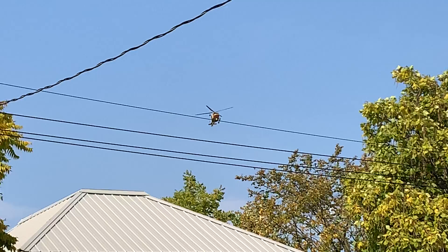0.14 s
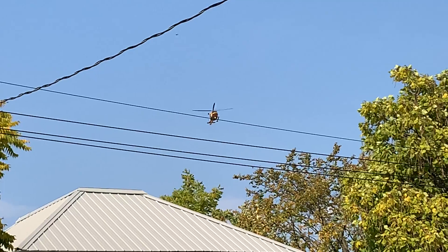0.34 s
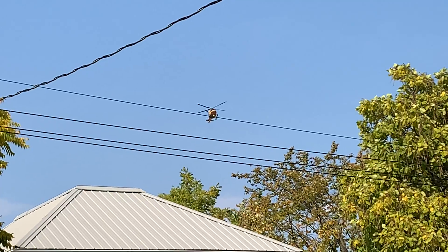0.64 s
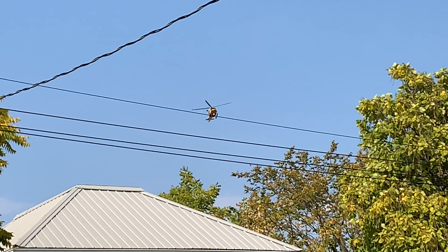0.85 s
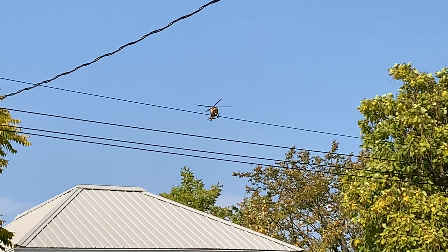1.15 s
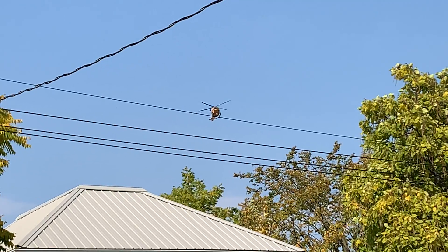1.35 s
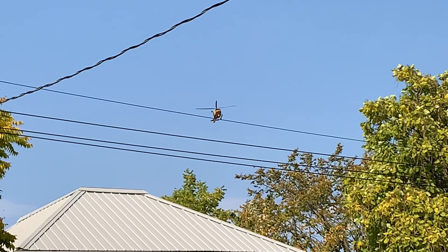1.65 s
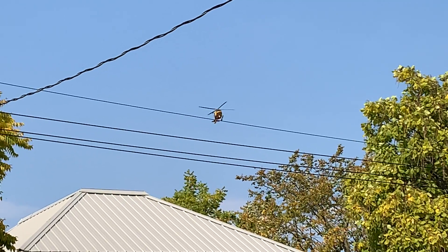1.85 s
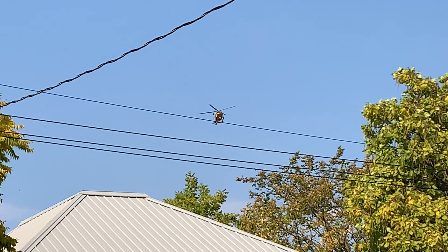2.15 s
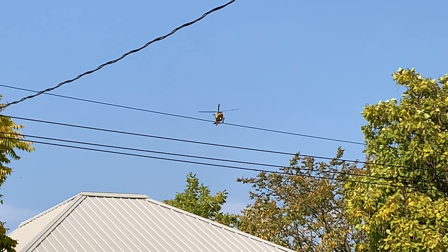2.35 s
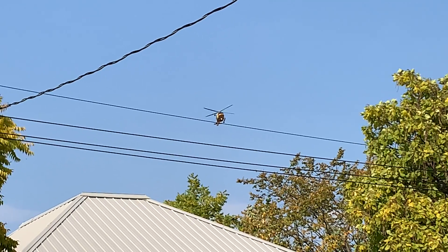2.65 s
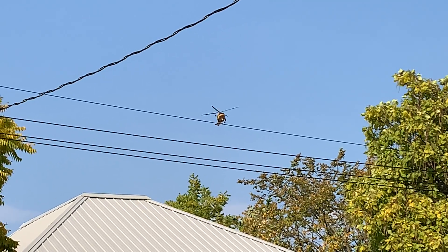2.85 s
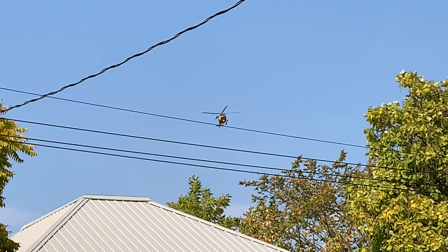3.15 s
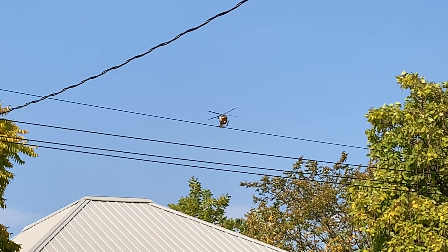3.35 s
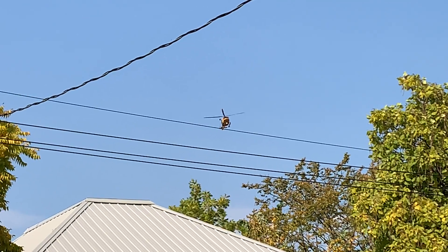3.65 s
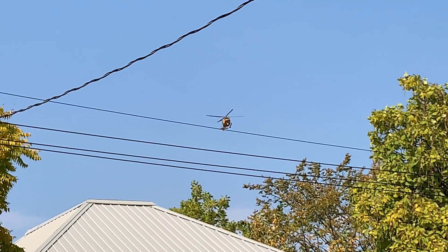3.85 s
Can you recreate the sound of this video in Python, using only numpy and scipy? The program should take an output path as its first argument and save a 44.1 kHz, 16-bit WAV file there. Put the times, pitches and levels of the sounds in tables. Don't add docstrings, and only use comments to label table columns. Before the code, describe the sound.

Distant helicopter hovering, rapid chopping blade slaps over a steady low drone and roar

```python
import sys
import numpy as np
from scipy import signal
from scipy.fft import rfft, irfft
from scipy.io import wavfile
from scipy.ndimage import uniform_filter1d

SR = 44100
rng = np.random.default_rng(int(sys.argv[2]) if len(sys.argv) > 2 else 0)


def invert_db(level):
    return 10 ** (np.asarray(level, dtype=float) / 20)


def wav_record(signal):
    frames = np.transpose(np.atleast_2d(signal))
    bounded = np.clip(frames, -1, 1)
    quanta = np.round(bounded * 32767).astype(np.int16)
    wavfile.write(sys.argv[1], SR, quanta)


N = 176400
TIME = np.arange(N) / SR
FREQ = np.arange(N // 2 + 1) * SR / N
BLADE_HZ = 21.505
TAIL_HZ = 55.16


def level(x, db):
    return x * invert_db(db) / np.sqrt(np.mean(x ** 2))


def colour(points, hz):
    table_hz, db = np.array(points, float).T
    return invert_db(np.interp(np.log(hz + 1), np.log(table_hz), db, left=-90, right=-90))


def walk(rate):
    hold = int(SR / rate)
    held = np.repeat(rng.standard_normal(N // hold + 1), hold)
    return 1.34 * uniform_filter1d(uniform_filter1d(held, hold), hold)[:N]


def bands(points, per_octave):
    spectrum = rfft(rng.standard_normal((2, N))) * colour(points, FREQ)
    place = np.log2(FREQ + 1) * per_octave
    first = int(np.log2(points[0][0]) * per_octave)
    last = int(np.log2(points[-1][0]) * per_octave) + 1
    for k in range(first, last + 1):
        triangle = np.clip(1 - abs(place - k), 0, 1)
        yield 2 ** (k / per_octave), irfft(spectrum * triangle, N)


# multiple of the rotor tone, level in dB.
TAIL_HARMONICS = [(1, -41), (2, -25), (3, -35), (4, -32), (5, -39.5), (6, -34), (7, -84), (8, -65)]
# multiple of the blade rate, level in dB.
BLADE_HARMONICS = [(2, -44), (3, -42), (4, -41), (5, -43)]


def rotor_tones(harmonics, hz):
    out = 0
    for multiple, db in harmonics:
        wander = 0.35 * np.sqrt(multiple) * walk(3.016)
        phase = 2 * np.pi * (multiple * hz * TIME + rng.random()) + wander
        flutter_db = 1.8 * walk(14)
        out = out + np.sqrt(2) * invert_db(db + flutter_db) * np.sin(phase)
    return np.array([out, 0 * out])


# time in seconds, level in dB, extra treble in dB, extra body in dB.
SLAP_COURSE = [(0, -36.5, 1.5, 2), (.09, -30.5, 4, 3), (.2, -39.5, 3.5, 14.5), (.55, -37, 11, 4),
               (.7, -31, 2, -1), (1.1, -30, 1, -6), (1.4, -31.5, 1, -4.5), (1.75, -38.5, 10.5, 4),
               (1.97, -33.5, -3.5, -23.5), (2.2, -37, 10.5, 8), (2.7, -34.5, 3, 3), (2.95, -29.5, 0.5, 4.5),
               (3.15, -31, 5, 7.5), (3.28, -25, 1, -4), (3.45, -22.5, -6.5, -1), (3.55, -26, 3.5, -2),
               (3.8, -23, -0.5, -5), (4, -27.5, -0.5, 1)]


def slap_course(column):
    course = np.array(SLAP_COURSE)
    return np.interp(TIME, course[:, 0], course[:, column])


BLADE_LEVELS = [-.5, -.8, 1.2, 0]
# frequency in Hz, density in dB per Hz.
SLAP_SPECTRUM = [(150, -10), (500, 1.5), (900, 2.5), (1600, -2), (2200, -7.5), (4500, -19), (5500, -35),
                 (8500, -41)]


def slaps():
    first_s, rise_s, decay_s, echo_s, echo_db = -0.0015, 0.009, 0.012, 0.03, -7
    turns = (TIME - first_s + rise_s) * BLADE_HZ
    passage, age = turns.astype(int), turns % 1 / BLADE_HZ
    rise = np.sin(np.pi / 2 * np.clip(age / rise_s, 0, 1)) ** 2
    late = np.maximum(age - rise_s, 0)
    envelope = rise * (np.exp(-late / decay_s) + invert_db(echo_db) * np.exp(-late / echo_s))

    count = passage[-1] + 1
    size_db = np.resize(BLADE_LEVELS, count) + 0.6 * rng.standard_normal(count)
    treble, body = invert_db(slap_course(column=2)), invert_db(slap_course(column=3))
    drift_blades = 4
    burst = 0
    for hz, band in bands(SLAP_SPECTRUM, per_octave=4):
        drift = uniform_filter1d(rng.standard_normal(count), drift_blades) * np.sqrt(drift_blades)
        tint_db = 2.2 * rng.standard_normal(count) + 1.5 * drift
        gain = invert_db(size_db + tint_db)[passage]
        if hz > 2300:
            gain = gain * treble
        elif hz < 1000:
            gain = gain * body
        burst = burst + band * gain
    return level(burst * envelope, 0) * invert_db(slap_course(column=1))


# time in seconds, peak level in dB, ring frequency in Hz.
GAP_RINGS = [(0.0933, -14.5, 1340), (0.2738, -20.5, 1203), (0.3687, -23.5, 1265), (0.4602, -21.5, 1260),
             (0.5501, -20, 1213), (0.596, -21.5, 1260), (0.6445, -14, 1405), (0.692, -20, 1370),
             (0.7378, -21.5, 1256), (0.7861, -22, 1460), (0.831, -18, 1530), (0.8834, -26, 1700),
             (0.924, -21, 1330), (0.9769, -17.5, 1760), (1.0181, -24, 1445), (1.064, -22, 1490),
             (1.1104, -44, 1176), (1.1598, -19.5, 1746), (1.2037, -25, 1310), (1.2491, -22, 1437),
             (1.3889, -15, 1353), (1.437, -14, 1445), (1.4797, -30, 1330), (1.5274, -31, 1310),
             (1.575, -20, 1336), (1.619, -21.5, 1366), (1.673, -16.5, 1315), (1.7589, -22.5, 1153),
             (1.945, -21, 1376), (2.0413, -22.5, 1170), (2.1355, -21, 1335), (2.56, -21, 1500),
             (2.8348, -22, 1850), (2.8784, -25, 1025), (2.9234, -18, 1160), (2.969, -20, 1217),
             (3.015, -25, 1044), (3.0634, -21.5, 1910), (3.1148, -19, 1650), (3.1593, -30, 1150),
             (3.2065, -19, 1364), (3.253, -15, 1360), (3.2977, -16, 1792), (3.3423, -37, 1210),
             (3.3882, -16, 1755), (3.438, -20, 1370), (3.484, -17, 1470), (3.531, -27, 1730),
             (3.5793, -15, 1770), (3.6244, -12, 1666), (3.6706, -14, 1680), (3.715, -15, 1190),
             (3.7633, -18, 1354), (3.8122, -16, 1403), (3.8576, -16, 987), (3.903, -12, 980)]
BRIGHT_RINGS = [(0.0892, -25.5, 3320), (0.4616, -28, 2480), (0.5532, -26.5, 3900), (0.599, -32, 3900),
                (0.6439, -29, 3830), (0.6903, -38, 3320), (0.7382, -24, 3620), (0.7811, -29.5, 3180),
                (0.9657, -27, 2960), (1.202, -24, 2980), (1.5738, -31, 3280), (1.761, -33, 3810),
                (2.1327, -33, 3090), (2.2762, -28, 2990), (2.317, -25, 2940), (2.387, -24, 3070),
                (2.6374, -28, 2870), (2.7646, -27, 2740), (2.8756, -25.5, 2960), (3.0648, -21, 2690),
                (3.2515, -24, 2470), (3.3903, -31, 3140), (3.4345, -28, 3090), (3.5758, -26, 3280),
                (3.6234, -21, 2720), (3.6706, -28, 3590), (3.7165, -32, 3600), (3.763, -25, 3000),
                (3.813, -20.5, 2870), (3.904, -21.5, 3040)]
DEEP_RINGS = [(0.505, -20, 502), (0.682, -22, 519), (1.949, -19, 598), (2.176, -22, 610),
              (2.391, -14.5, 806), (2.695, -20.5, 848), (2.767, -19.5, 718), (2.828, -19, 610),
              (3.014, -24, 558), (3.158, -14, 530), (3.212, -19, 536), (3.253, -9, 830),
              (3.296, -14.5, 590), (3.387, -20, 615), (3.439, -16, 877), (3.669, -15, 520),
              (3.713, -13.5, 618), (3.82, -14, 530), (3.861, -12.5, 993)]


def rings():
    attack_s, decay_s, trim_db = 0.005034, 0.015, -4.5
    out, age = np.zeros((2, N + SR)), TIME[:SR // 12]
    swell = age / attack_s * np.exp(1 - age / attack_s)
    decay = (1 - np.exp(-age / attack_s)) * np.exp(-age / decay_s)
    for start, db, hz in GAP_RINGS + BRIGHT_RINGS + DEEP_RINGS:
        width_hz = 92 * hz / 1000
        smooth = signal.butter(2, width_hz, fs=SR, output="sos")
        noise = signal.sosfilt(smooth, rng.standard_normal((2, 2, len(age))))[..., ::-1]
        wobble = (noise[0] + 1j * noise[1]) / noise.std() / 2 + [[1], [0]]
        ring = (wobble * np.exp(2j * np.pi * hz * age)).real
        at = max(int((start - attack_s / 2) * SR), 0)
        out[:, at:at + len(age)] += invert_db(db + trim_db) / 2 * (swell + decay) * ring
    return out[:, :N]


# frequency in Hz, density in dB per Hz.
ROAR_SPECTRUM = [(22, -43.5), (45, 0.5), (90, -0.5), (400, -6), (1500, -19.5), (4000, -32), (8000, -58),
                 (16000, -71.5)]


def roar():
    load = uniform_filter1d(slap_course(column=1), size=SR // 3)
    load_db = 0.35 * (load - load.mean())
    swell_db = 0.5 * walk(3.01)
    out = 0
    for hz, band in bands(ROAR_SPECTRUM, per_octave=1.8):
        follow_db = load_db if hz > 100 else -load_db
        flicker_db = 1.8 * walk(9.7)
        out = out + band * invert_db(swell_db + follow_db + flicker_db)
    return level(out, -25)


# centre in Hz, width in Hz, gain in dB.
REFLECTION_BUMPS = [(420, 70, -5), (540, 60, 3), (630, 40, 3), (740, 60, -2), (850, 60, 4), (1190, 50, 3),
                    (1390, 70, 5), (1470, 40, 3), (1570, 50, -4), (1720, 90, 5), (2050, 120, -3),
                    (2280, 100, 3), (2750, 250, -3), (3600, 400, 3)]


def gardens(x):
    db = sum(gain * np.exp(-((FREQ - hz) / width) ** 2) for hz, width, gain in REFLECTION_BUMPS)
    return irfft(rfft(x) * invert_db(db), N)


# start in seconds, length in seconds, level in dB, low crunch weight in dB.
LEAF_RUSTLES = [(0, 1, -63.5, -6), (0.023, 0.013, -56.5, -19), (0.096, .015, -63, -16),
                (0.332, 0.042, -61, -5), (0.68, 0.018, -56.5, -14), (1, .02, -67, -12),
                (1.545, 0.01, -54, -8), (1.888, 0.0088, -54, -18), (1.935, 0.082, -51.5, -5),
                (2.028, 0.052, -57.5, 2), (2.13, 0.02, -75.5, 20), (2.2, 0.32, -70.5, 19),
                (2.346, 0.027, -45, -1), (2.384, 0.043, -49, 8), (2.444, 0.016, -35, -6),
                (2.486, 0.036, -41.5, 2.5), (2.567, 0.15, -57, 6), (2.634, 0.045, -55.5, -1),
                (2.688, 0.032, -52, 0), (2.764, 0.034, -46.5, 6), (2.823, 0.066, -71, 19),
                (2.94, 0.23, -69, 16), (3.157, 0.0093, -56, -8), (3.384, 0.037, -58.5, 10),
                (3.436, 0.074, -58.5, 14), (3.584, 0.11, -57, -29), (3.718, 0.023, -56, 9.5),
                (4, 0.0088, -52, 7)]
# frequency in Hz, density in dB per Hz.
CRISP_SPECTRUM = [(5000, 2), (8000, 7), (10500, 3.5), (13000, -6.5), (16000, -7.5)]
CRUNCH_SPECTRUM = [(400, 12.5), (800, 9), (1500, 13.5), (3500, 15), (6500, 4.5), (8500, -10.5)]
SCUFF_SPECTRUM = [(250, 13), (450, 27), (850, 20), (1400, -22)]


def leaves():
    attack_s, release, grains_per_s, scuff_smear_s = 0.004, 0.55, 6000, 0.068
    grains = (rng.random((2, N)) < grains_per_s / SR) * rng.standard_normal((2, N))
    spread_db = 2.3 * rng.exponential(size=(2, N))
    spectrum = rfft(grains * invert_db(spread_db) * invert_db(2.2 * walk(45)))
    crisp = irfft(spectrum * colour(CRISP_SPECTRUM, FREQ), N)
    crunch = irfft(spectrum * colour(CRUNCH_SPECTRUM, FREQ), N)
    scuff = irfft(spectrum * colour(SCUFF_SPECTRUM, FREQ), N)

    top, low = np.zeros(N), np.zeros(N)
    for start, length, db, low_db in LEAF_RUSTLES:
        tail = np.exp(-np.maximum(TIME - start - length, 0) / (release * length))
        press = invert_db(db) * np.clip((TIME - start) / attack_s, 0, 1) * tail
        top = top + press
        low = low + invert_db(low_db) * press
    slow = uniform_filter1d(low, int(scuff_smear_s * SR))
    return (crisp * top + crunch * low + scuff * slow) / np.sqrt(np.mean(crisp ** 2))


# start in seconds, length in seconds, pitch in Hz, level in dB.
BIRD_NOTES = [
    (.33, .05, 7700, -63),
    (1.09, .02, 7000, -58),
    (2.2, .05, 8000, -66),
    (2.3, .09, 7640, -47),
    (2.61, .04, 5800, -54),
    (2.65, .07, 8000, -64),
    (2.92, .08, 8000, -62),
    (3.06, .03, 2700, -39),
    (3.31, .06, 8050, -66),
    (3.6, .14, 11400, -60),
]


def bird():
    out = np.zeros(N)
    for start, length, hz, db in BIRD_NOTES:
        envelope = np.sin(np.pi * np.clip((TIME - start) / length, 0, 1)) ** 0.5
        out = out + invert_db(db) * envelope * np.sin(2 * np.pi * hz * TIME + 0.8 * walk(51))
    return np.array([out, 0 * out])


# frequency in Hz, likeness from 0 to 1, phase in radians by which the left leads.
PORTS_BELOW = [(40, .82, 0), (110, .95, -.2), (300, .89, -.3), (950, .66, -.8), (2200, .52, -1.6),
               (3500, .48, -2.2), (4500, .45, -4.7)]
PORTS_ABOVE = [(6400, .7, -6.5), (8750, .99, -3 * np.pi), (11100, .99, -4 * np.pi), (16000, .99, -19)]


def ports(pair):
    hz, like, phase = np.array(PORTS_BELOW + PORTS_ABOVE).T
    like = np.clip(np.interp(np.log(FREQ + 1), np.log(hz), like), 0, 1)
    turn = np.exp(0.5j * np.interp(FREQ, hz, phase))
    mid, side = rfft(pair) * np.sqrt([(1 + like) / 2, (1 - like) / 2])
    bump = invert_db(5 / 2 * np.exp(-((FREQ - 4700) / 1100) ** 2))
    return irfft([(mid + side) * turn / bump, (mid - side) / turn * bump], N)


def scene():
    rotors = rotor_tones(TAIL_HARMONICS, TAIL_HZ) + rotor_tones(BLADE_HARMONICS, BLADE_HZ)
    aircraft = rotors + gardens(slaps() + roar()) + rings()
    return ports(aircraft + leaves() + bird())


def band_limit(x):
    return signal.sosfilt(signal.butter(12, 15900, fs=SR, output="sos"), x)


def record(dry):
    ceiling = 0.85
    mix = ceiling * np.tanh(dry / ceiling)
    return band_limit(mix)


dry = scene()
out = record(dry)
wav_record(out)
```